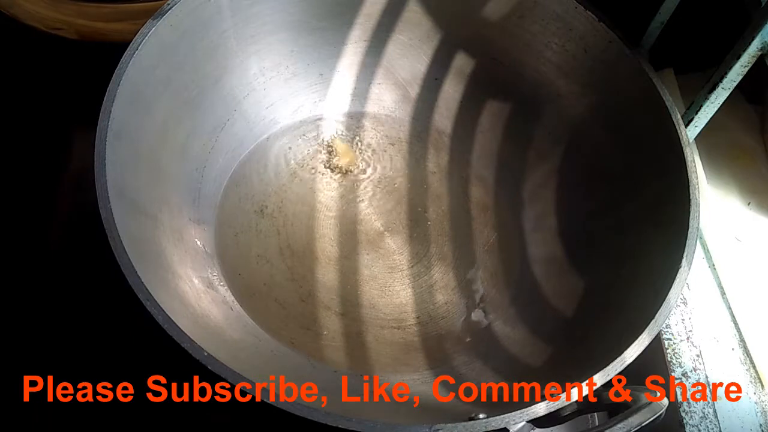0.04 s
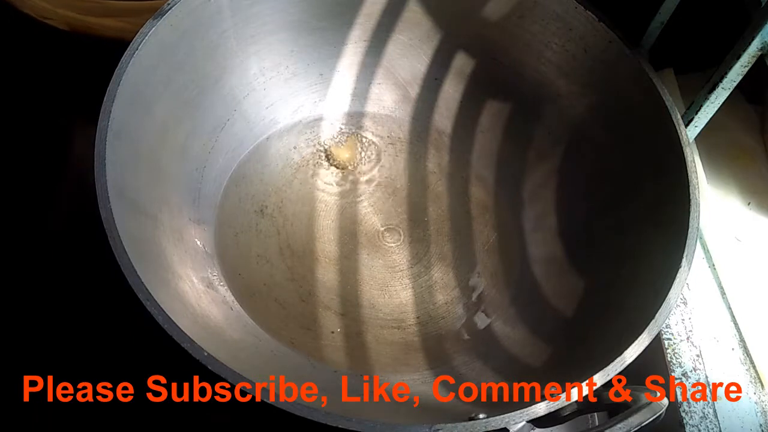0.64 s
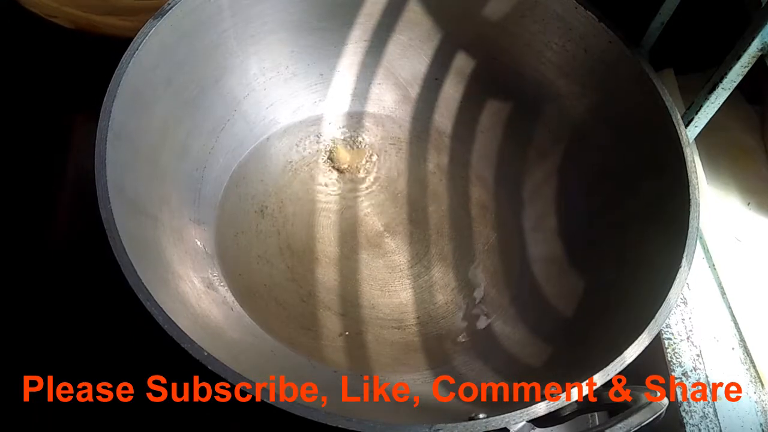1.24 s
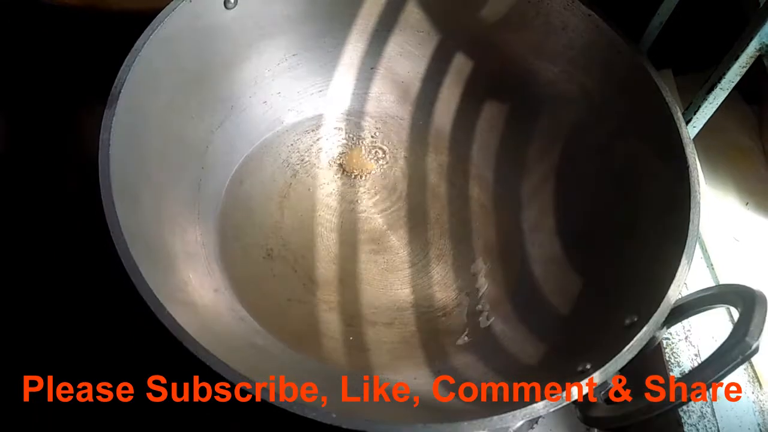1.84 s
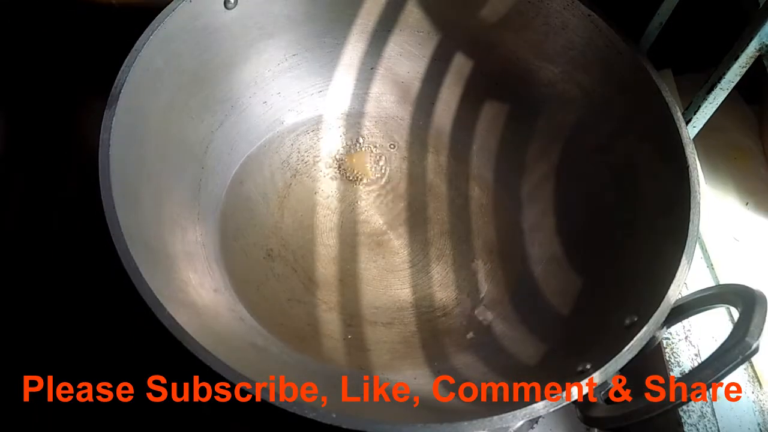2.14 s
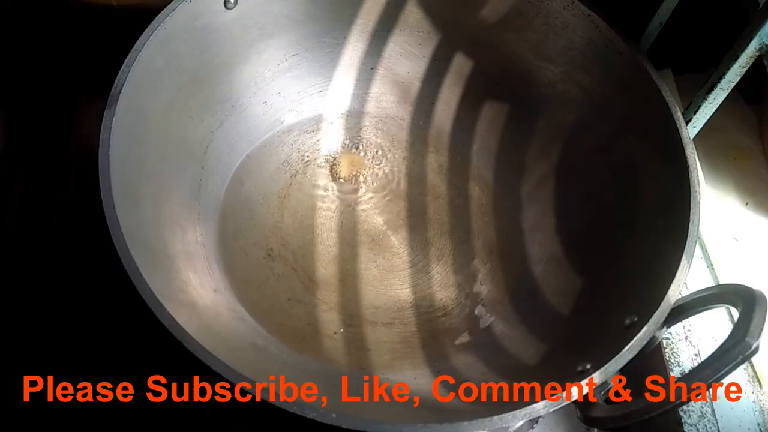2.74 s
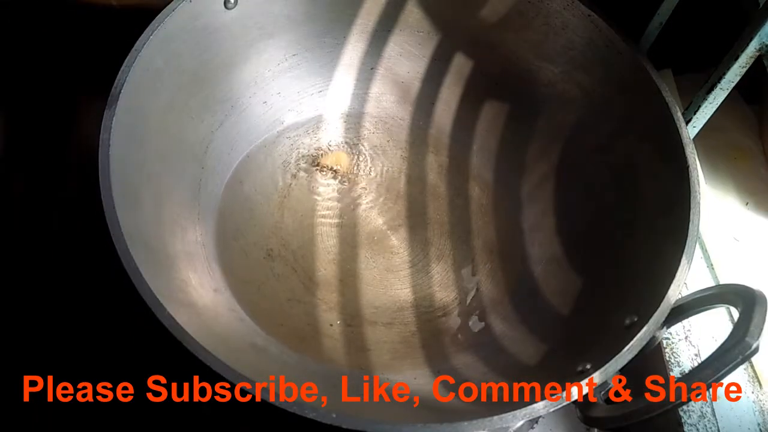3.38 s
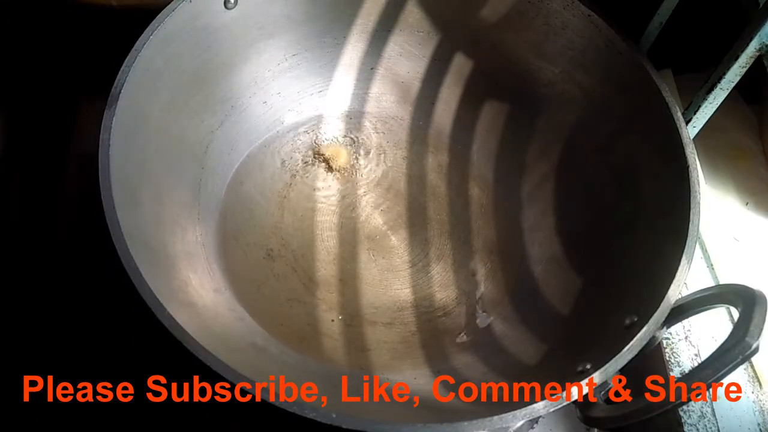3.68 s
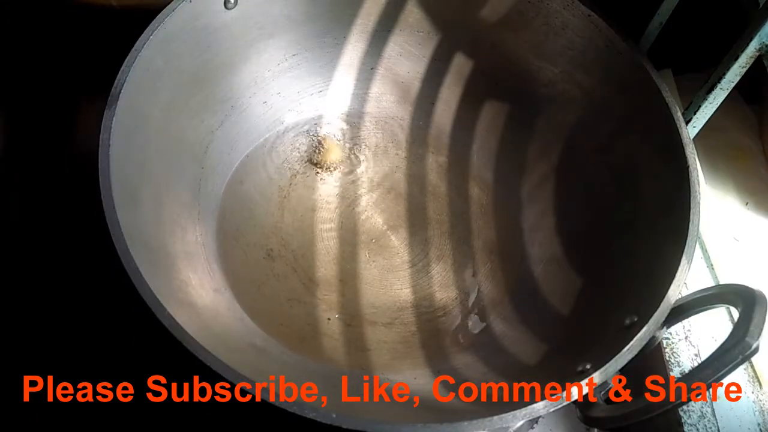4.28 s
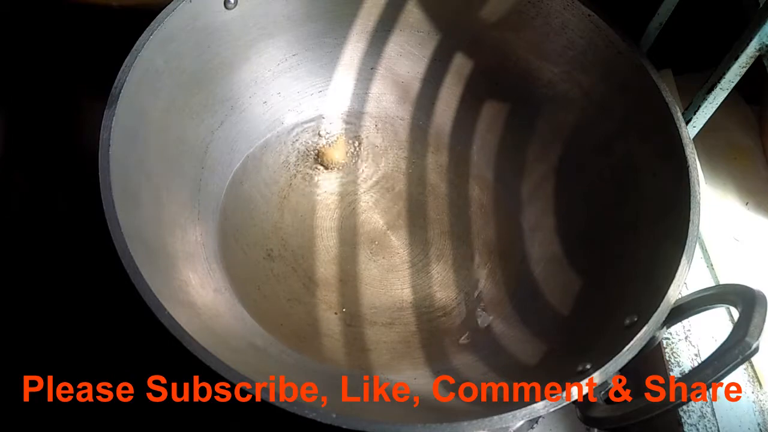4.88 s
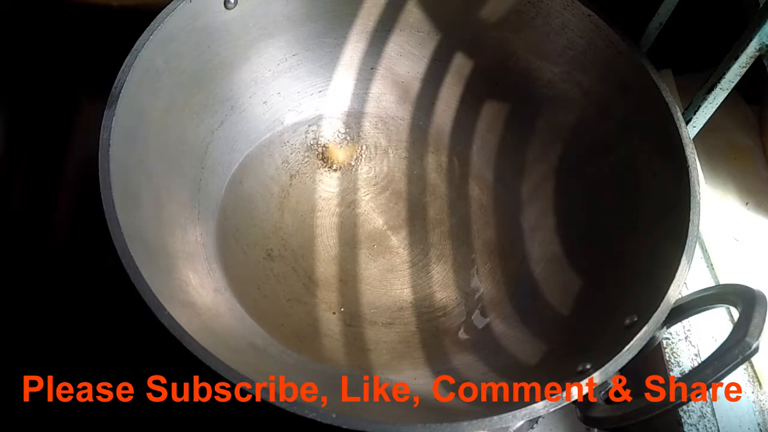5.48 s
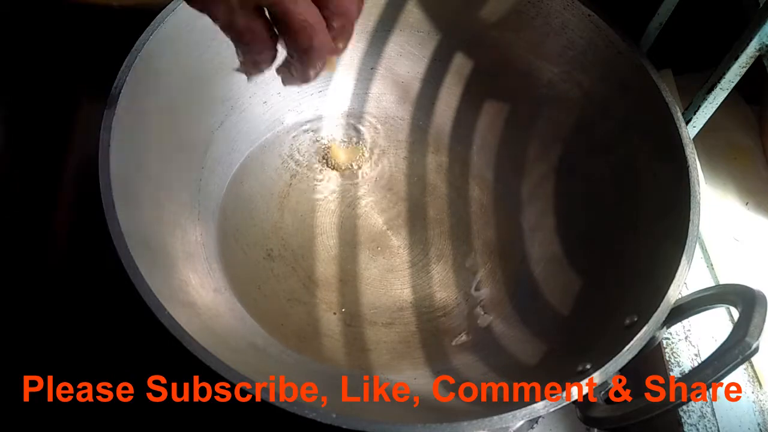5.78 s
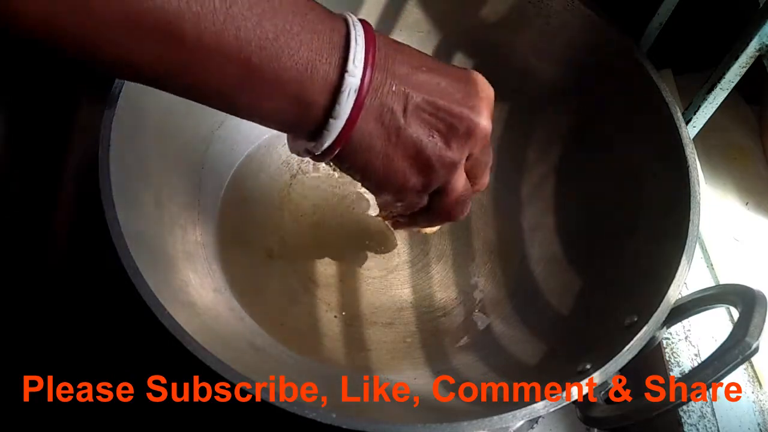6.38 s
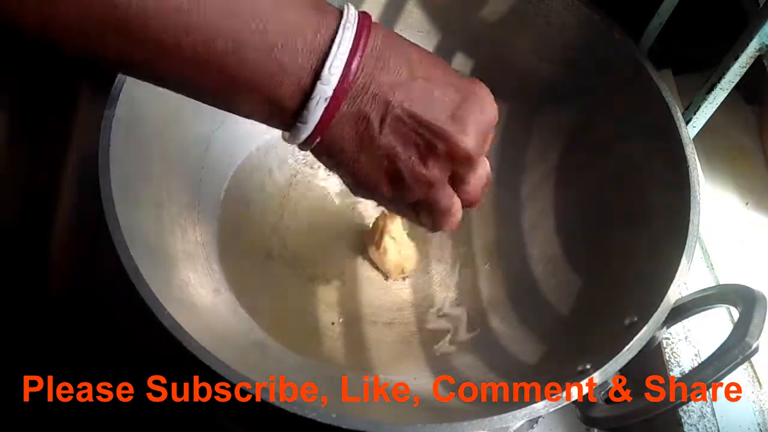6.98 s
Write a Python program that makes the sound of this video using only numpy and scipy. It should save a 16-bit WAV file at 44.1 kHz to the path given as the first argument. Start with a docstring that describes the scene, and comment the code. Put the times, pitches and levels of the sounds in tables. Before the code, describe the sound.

A drop of batter spits in hot oil in a deep metal pan, giving sharp, irregular pops with faint steam whistles. About a second in, a knock leads into a loud, ringing clatter of a steel dish. Soft knocks, low thuds and one short muffled hoot come between further pops. At the very end, a lump of batter starts to sizzle. The microphone is close, in a small, quiet kitchen.

```python
"""A drop of batter spits in hot oil in a deep metal pan, close by, in a small, quiet kitchen.
Each steam bubble snaps its skin of oil and rings the hollow inside; steam whistles faintly in the pan.
Nearby some steelware, likely a dish, is bumped and clatters. There are dull knocks and low thuds,
and something hoots once, muffled. At the end a lump of batter meets the oil and starts to sizzle."""
import sys
import numpy as np
from scipy import signal
from scipy.fft import rfft, irfft, next_fast_len
from scipy.io import wavfile
from scipy.ndimage import uniform_filter1d

SR = 44100
rng = np.random.default_rng(int(sys.argv[2]) if len(sys.argv) > 2 else 0)


def master_out(mix):
    """Clip the mix to full scale and print it as 16-bit PCM to the path in sys.argv[1]."""
    frames = np.transpose(np.atleast_2d(mix))
    ceiling = np.clip(frames, -1, 1)
    pcm = np.round(ceiling * 32767).astype(np.int16)
    wavfile.write(sys.argv[1], SR, pcm)


N = 318754
SIZE = 32768  # samples set aside for one short sound
T, HZ = np.arange(SIZE) / SR, np.fft.rfftfreq(SIZE, 1 / SR)  # its times and frequencies
TIME = np.arange(N) / SR
ROOM_T60 = .26  # a "t60" is the seconds a sound takes to fade by 60 dB

# tone of a bubble's oily skin snapping: (frequency [Hz], gain [dB])
SNAP_TONE = [(300, -39.5), (1500, -27), (3200, -25), (5500, -15.5), (7500, -8), (9200, -3), (10500, -1),
             (11500, -4), (12700, -3.5), (13500, -8), (14400, -7)]


def amp(db):
    """Turns decibels into a factor to multiply by."""
    return 10 ** (np.asarray(db) / 20)


def unit_level(x):
    """Scales a sound to an average (rms) level of 1."""
    return x / np.sqrt(np.mean(x ** 2) + 1e-30)


def at_level(x, db):
    """Scales a hit so that its energy, spread over 40 ms, has this level."""
    return amp(db) * x / np.sqrt(np.sum(x ** 2) / (.04 * SR) + 1e-30)


def curve(points, hz):
    """Joins the points of a tone table and gives its values at hz."""
    f, value = np.transpose(points)
    return np.interp(np.log(hz + 1), np.log(f + 1), value)


def add(mix, s, sound):
    """Mixes a sound in at s seconds."""
    part = mix[max(round(s * SR), 0):][:len(sound)]
    part += sound[:len(part)]


def fade(t60):
    """Dies away by 60 dB every t60 seconds."""
    return np.exp(-np.log(1000) * T / t60)


def colour(x, db):
    """Filters a sound with one gain in dB for each frequency in HZ."""
    log_gain = np.log(amp(np.maximum(db, db.max() - 90)))
    mirrored = np.r_[log_gain, log_gain[-2:0:-1]]
    response = np.exp(np.conj(signal.hilbert(mirrored)))  # rings after a hit, never before
    return signal.fftconvolve(x, irfft(response[:len(HZ)])[:SIZE // 4])[:len(x)]


def resonance(hz, width_hz):
    """Gain in dB of something that rings around one pitch."""
    return -10 * np.log10(1 + ((HZ ** 2 - hz ** 2) / ((HZ + 1) * width_hz)) ** 2)


def echoes(direct_db, t60, near_t60=.035, rise_s=.00083, crack_db=4, crack_t60=.0066):
    """Fading noise: the direct crack, quick echoes from close by, then the kitchen."""
    near = np.hypot(amp(crack_db) * fade(crack_t60), fade(near_t60))
    decay = np.hypot(amp(direct_db) * near, fade(t60))
    return rng.standard_normal(SIZE) * decay * (1 - np.exp(-T / rise_s))


def puff(length_s, tone_db):
    """Filtered noise that swells and sinks once."""
    swell = np.hanning(int(np.clip(length_s * SR, 2, SIZE)))
    noise = colour(rng.standard_normal(SIZE), tone_db)[-len(swell):]
    return unit_level(noise * swell)


def pan_tone():
    """Gain in dB for sound that bounces around inside the pan."""
    # ringing of the air between oil and pan wall: (pitch [Hz], width [Hz], gain [dB])
    air_rings = [(1562, 35, 18.5), (1956, 120, 16.5), (2516, 150, 10), (2946, 48, 11.5), (3518, 42, 14.5),
                 (3930, 98, 6.5), (4517, 57, 8.5), (4710, 53.3, 7.5), (5170, 69, 6), (5570, 40, 9),
                 (6144, 90, 4.5), (6770, 240, 4), (8400, 150, -0.5), (9075, 160, 4), (10330, 550, 3),
                 (12910, 580, 5)]
    return 10 * np.log10(1 + sum(amp(db + resonance(hz, width)) ** 2 for hz, width, db in air_rings))


def kitchen_air(level_db=-72.5, waver_db=.63, calm_hz=3500):
    """Quiet air: the lows and middle waver in patches, the hiss above stays even."""
    # tone of the still kitchen: (frequency [Hz], gain [dB])
    air_tone = [(20, -22), (45, -12.5), (83, 0.5), (115, -9), (170, -12.5), (250, -10.5), (370, -22),
                (460, -9), (560, -6), (830, -4.5), (1400, -11), (2100, -15.5), (3200, -23.5), (6000, -26.5),
                (14300, -30)]
    hz, _, spectrum = signal.stft(rng.standard_normal(N), SR, nperseg=1024)
    patches = uniform_filter1d(rng.standard_normal(spectrum.shape), size=5, axis=0)
    patches = unit_level(uniform_filter1d(patches, size=9, axis=1))
    waver = waver_db * patches / (1 + (hz[:, None] / calm_hz) ** 4)
    spectrum *= amp(curve(air_tone, hz)[:, None] + waver)
    return amp(level_db) * unit_level(signal.istft(spectrum, SR, nperseg=1024)[1][:N])


def murmur(swell_db=5, swell_s=.09):
    """Air hums faintly at steady pitches, each swelling and sinking by itself."""
    # the kitchen's low hums, then the pan's over the simmering oil: (pitch [Hz], width [Hz], level [dB])
    hums = [(165.5, 8.3, -86.5), (310, 38, -84), (449, 30, -85), (850, 120, -79.5), (1094, 190, -82.5),
            (1464, 170, -79.5), (1967, 160, -81), (2420, 600, -89), (3040, 250, -95.5)]
    out = np.zeros(N)
    steps = np.arange(0, 8, swell_s)
    for hz, width_hz, db in hums:
        wander = np.clip(rng.standard_normal(300), -2, 2)[:len(steps)]
        swell = amp(swell_db * np.interp(TIME, steps, wander))
        hum = colour(rng.standard_normal(N), 2 * resonance(hz, width_hz))
        out += amp(db) * unit_level(swell * hum)
    return out


def thuds(steepness=1.7, width_share=.41):
    """Faint bumps, each ringing around one deep pitch."""
    # low bumps: (time [s], level [dB], pitch [Hz], t60 [s])
    bumps = [(1.41, -71, 55.2, .19), (1.903, -61.5, 64, .03), (2.042, -66, 82, 0.65),
             (3.639, -70.5, 85, .16), (6.09, -64, 80, .1), (6.599, -71.5, 170, 0.65)]
    out = np.zeros(N)
    for s, db, hz, t60 in bumps:
        thud = colour(echoes(0, t60, rise_s=.004), steepness * resonance(hz, hz * width_share))
        add(out, s, at_level(thud, db))
    return out


def knocks(steepness=1.9, hard_db=-37, tick_db=-14, boom_db=-7, boom_hz=265, room_hz=455):
    """Soft blows on heavy things: a tick, a dull body and a boom that stir a low note of the room."""
    # knocks around the stove: (time [s], body level [dB], body pitch [Hz])
    blows = [(.48, -66, 646.4), (0.7526, -60, 600), (0.7594, -41, 864), (1.953, -63.5, 800),
             (2.259, -66, 606), (2.979, -54, 690)]
    out = np.zeros(N)
    room = 20 * np.log10(np.hypot(1, amp(8 + resonance(room_hz, width_hz=25))))
    for s, db, hz in blows:
        # a softer blow stays in contact longer, so it rises and fades more slowly
        rise_s = .0003 * 2 ** ((hard_db - db) / 5)
        t60 = .23 * 2 ** ((hard_db - db) / 28.5)
        tick = colour(echoes(0, t60=.025, rise_s=rise_s), steepness * resonance(1100, width_hz=1400))
        body = colour(echoes(0, t60, rise_s=rise_s), steepness * resonance(hz, hz * .8) + room)
        boom = colour(echoes(0, t60, rise_s=rise_s), steepness * resonance(boom_hz, boom_hz) + room)
        add(out, s, at_level(tick, db + tick_db) + at_level(body, db) + at_level(boom, db + boom_db))
    return out


def steam_whistles(width_hz=85, count=12, faint_per_s=1, faint_s=.14, faint_hz=2686, faint_db=-84.5):
    """Thin jets of steam make the air in the pan sing in short, fuzzy whistles."""
    # the clearer whistles: (middle time [s], length [s], pitch [Hz], level [dB])
    clear = [(.04, 0.086, 1500, -68), (0.356, .13, 1494, -61.5), (.33, .26, 1963, -67.5),
             (.472, 0.24, 1492, -68), (1.846, .15, 1544, -66), (2.522, .14, 1495, -75.5),
             (3.529, 0.15, 1503, -68), (4.13, 0.081, 1960, -72.5), (4.21, .1, 1430, -71.5),
             (4.793, 0.17, 1938, -74), (4.962, .12, 1068, -68.5), (5.753, .5, 1948, -74),
             (5.904, .077, 1113, -68.5), (5.962, .19, 1487, -73), (6.251, .74, 1946, -79.5),
             (6.542, 0.097, 1060, -71), (6.583, .17, 1520, -73.5), (6.769, .12, 1498, -67.5),
             (6.907, .21, 2480, -81)]
    # fainter, higher ones come at random
    when, height = rng.random((count, 2)).T
    pitches = faint_hz * 2 ** (.17 * (2 * height - 1))
    times = when * count / faint_per_s
    faint = [(s, faint_s, hz, faint_db) for s, hz in zip(times, pitches) if s < N / SR]
    out = np.zeros(N)
    for s, length, hz, db in clear + faint:
        add(out, s - length / 2, amp(db) * puff(length, 2 * resonance(hz, width_hz)))
    return out


def hoot(peak_s=2.635, pitch_hz=224, fall_hz_per_s=560, ring_hz=450, width_hz=95, low_hz=186):
    """A short falling hoot through a wall; two low notes of the kitchen ring on after it."""
    t = np.arange(-.1, .1, 1 / SR)  # seconds from the peak
    hz = pitch_hz - fall_hz_per_s * t
    slope_s = np.where(t < 0, .019, .022)  # rises a little faster than it dies
    swell = amp(-42.5) / np.cosh(2 * t / slope_s)
    phase = 2 * np.pi * np.cumsum(hz) / SR
    # each overtone is louder the nearer it is to ring_hz
    second, third = (np.sin(k * phase) / np.hypot(1, 2 * (k * hz - ring_hz) / width_hz) for k in (2, 3))
    out = np.zeros(N)
    add(out, peak_s + t[0], swell * (second + amp(-4) * (np.sin(phase) + third)))
    for room_hz, db in (ring_hz, -56), (low_hz, -57.5):
        ring = np.sin(2 * np.pi * room_hz * T) * fade(t60=.19) * (1 - np.exp(-T / .0038))
        add(out, peak_s + .023, at_level(ring, db))
    return out


def dish_clatter(ring_t60=.17, rise_s=.0038, echo_db=-8, uneven_db=1.5):
    """The steel dish rocks and bounces; every hit crashes and sets the same notes ringing."""
    # hits of the dish: (time [s], crash level [dB], ring level [dB], treble limit [Hz])
    hits = [(0.813, -34, -43.5, 15000), (.819, -27, -31.5, 14500), (.843, -25.5, -23, 9100),
            (.857, -30, -27.5, 11980), (.869, -25, -19, 15000), (.884, -28.5, -22, 14990),
            (.934, -27, -36, 14000), (.965, -27.5, -27.5, 13100), (0.986, -37, -50, 13900),
            (1.006, -42, -59, 10500), (1.066, -44.5, -47, 15100)]
    # notes the steel rings at: (pitch [Hz], gain [dB])
    notes = [(950, -19.5), (1838, -10), (2449, -12.5), (2560, -22), (3133, -17.5), (3300, -19.5),
             (3688, -16.5), (3930, -8), (4056, -4.5), (5087, -18.5), (5728, -14), (6024, -15), (6316, -8),
             (6531, -7.5), (6724, 0), (7235, -16), (7780, -14), (7885, -14.5), (8122, -8), (8463, -3),
             (8711, -5), (9108, -12.5), (9614, -5.5), (10167, -6.5), (10698, 3), (11030, -6.5), (11653, 2),
             (12581, 3), (13180, -11), (14213, 3.5)]
    # tone of the crash: (frequency [Hz], gain [dB])
    crash_tone = [(100, -34.5), (350, -20.5), (600, -12.5), (950, -7.5), (1400, -3.5), (2500, -7),
                  (4000, -3), (5200, -4.5), (8800, 1.5), (12500, 3.5), (14400, 4.5)]
    out = np.zeros(N)
    hz, db = np.transpose(notes)
    # the crash is strongest around the notes
    body = 10 * np.log10(1 + sum(amp(6 + resonance(f, width_hz=90)) ** 2 for f in hz))
    for s, crash_db, ring_db, top_hz in hits:
        phase, luck = rng.random(len(hz)), rng.standard_normal(len(hz))
        strength = amp(db + uneven_db * luck) / np.sqrt(1 + (hz / top_hz) ** 20)
        waves = np.sin(2 * np.pi * (hz[:, None] * T + phase[:, None]))
        ring = strength @ waves * fade(ring_t60) * (1 - np.exp(-T / rise_s))
        room = signal.fftconvolve(ring, echoes(0, ROOM_T60))[:SIZE]
        treble_cut = 10 * np.log10(1 + (HZ / top_hz) ** 20)
        crash = colour(echoes(direct_db=3, t60=.31), curve(crash_tone, HZ) + body - treble_cut)
        add(out, s, at_level(ring, ring_db) + at_level(room, ring_db + echo_db))
        add(out, s, at_level(crash, crash_db))
    return out


def sizzle(start_s=7.022, rise_s=.059, level_db=-54, bubbles_per_s=5000):
    """Wet batter sinks into the oil, and thousands of tiny bubbles burst each second."""
    # tone of the sizzle: (frequency [Hz], gain [dB])
    sizzle_tone = [(300, -32), (700, -15), (1100, -8.5), (2000, 0), (2700, -2), (4200, -10), (5200, -6.5),
                   (7000, -4.5), (10000, -11), (12000, -19.5), (14300, -21)]
    strength = rng.standard_normal(N) * amp(-np.minimum(rng.exponential(1, N), 5))
    clicks = strength * (rng.random(N) < bubbles_per_s / SR)
    bursts = signal.fftconvolve(clicks, echoes(7.4, ROOM_T60))[:N]
    hiss = colour(bursts, curve(sizzle_tone, HZ) + .092 * pan_tone())
    swell = np.tanh(np.maximum(TIME - start_s, 0) / rise_s)
    return amp(level_db) * swell * unit_level(hiss)


def fizzes(level_db=-78.5):
    """Clouds of very small bubbles fizz softly between the spits."""
    # bubble clouds: (middle time [s], length [s])
    clouds = [(0.236, 0.44), (1.28, 0.18), (1.481, 0.24), (2.715, .09), (3.22, 0.18)]
    out = np.zeros(N)
    for s, length in clouds:
        add(out, s - length / 2, amp(level_db) * puff(length, curve(SNAP_TONE, HZ) + pan_tone()))
    return out


def faint_bubbles(count=12, per_s=.95, level_db=-84, snap_hz=9100, ring_hz=7000):
    """Small bubbles that burst at random moments, as extra rows for spits()."""
    when, loudness, height = rng.random((count, 3)).T
    times = when * count / per_s
    levels = level_db + 3 * (2 * loudness - 1)
    pitches = ring_hz * 2 ** (.3 * (2 * height - 1))
    return [(s, db, snap_hz, db, hz, 0) for s, db, hz in zip(times, levels, pitches) if s < N / SR]


def spits(steepness=1.3, typical_hz=4400, typical_width_hz=310, typical_db=-61.5):
    """Steam bubbles burst in the pan: each snaps its oily skin and rings the small hollow inside."""
    # bursting bubbles: (time [s], snap level [dB], snap pitch [Hz], ring level [dB], ring pitch [Hz],
    # direct sound over the room [dB])
    bubbles = [(0.0203, -52.5, 11500, -85, 3420, 4), (.098, -65, 9400, -38.5, 3260, 3),
               (0.0988, -54.5, 6950, -43.5, 6600, 11.5), (.112, -75, 6600, -39.5, 3550, 18),
               (0.343, -70, 8800, -74.5, 4100, -9), (.433, -52, 11850, -63, 4310, 2),
               (0.675, -71.5, 9536, -79, 7130, -2), (1.182, -56, 12900, -72, 6770, 10),
               (1.3467, -65, 9830, -69, 6510, 3), (1.582, -68, 10400, -76, 6600, -8),
               (1.794, -85, 12000, -45.5, 5580, -4), (2.259, -82, 8630, -65.5, 7850, -3),
               (2.3742, -52, 11900, -63, 4350, 3), (2.437, -64, 12000, -71, 4320, 16),
               (2.961, -46, 12950, -64, 4460, -15), (3.535, -50.5, 8870, -46, 5580, -12),
               (3.577, -60.5, 9100, -53, 6020, 7), (4.1524, -51, 12000, -62, 4270, -3),
               (4.172, -50, 12940, -61.5, 3590, -8), (4.211, -53, 13000, -64, 4550, 0),
               (4.228, -48, 9500, -68, 3660, 5), (4.289, -52.5, 10460, -68, 4800, -5),
               (4.3002, -48, 10800, -59.5, 4760, 9), (4.451, -54, 9480, -70.5, 4610, 5.5),
               (4.661, -66, 9000, -67.5, 7900, -10), (4.6694, -64, 9100, -49, 8800, 8.5),
               (5.487, -57, 10550, -69, 4640, -11), (5.541, -42, 12900, -54, 4630, 6),
               (5.598, -51.5, 12800, -52, 8500, -1.5)]
    out, pan = np.zeros(N), pan_tone()
    for s, snap_db, snap_hz, ring_db, ring_hz, direct_db in bubbles + faint_bubbles():
        # a wider resonance dies sooner: small, high hollows do, and so do those torn open violently
        violence = max(ring_db - typical_db, 0) / 25
        width_hz = typical_width_hz * (ring_hz / typical_hz) ** 2.1 * 2 ** violence
        skin = 20 * np.log10(np.hypot(1, amp(6 + resonance(snap_hz, width_hz=700))))
        snap = colour(echoes(direct_db, ROOM_T60), curve(SNAP_TONE, HZ) + skin + pan)
        ring = colour(echoes(direct_db, ROOM_T60), steepness * resonance(ring_hz, width_hz) + pan)
        add(out, s - .001, at_level(snap, snap_db) + at_level(ring, ring_db))
    return out


def scene():
    """All sounds reach two close microphone openings, with slightly different timing in the treble."""
    # how unlike left and right are: (frequency [Hz], side over mid [dB])
    stereo_spread = [(60, -49), (2900, -68), (4400, -42), (8100, -11.5), (15000, -8)]
    mid = spits() + fizzes() + dish_clatter() + knocks() + thuds()
    mid = mid + steam_whistles() + murmur() + hoot() + sizzle() + kitchen_air()
    size = next_fast_len(N + SIZE)
    hz = np.fft.rfftfreq(size, 1 / SR)
    ripple = 1j * np.sqrt(2) * np.sin(2 * np.pi * hz / 1900)  # which side leads changes with frequency
    side = irfft(rfft(mid, size) * amp(curve(stereo_spread, hz)) * ripple, size)[:N]
    return np.array([mid + side, mid - side])


def record(dry):
    """Cuts off the treble above 14400 Hz."""
    low_pass = signal.firwin(511, 14400, window=("kaiser", 8), fs=SR)
    return signal.oaconvolve(dry, low_pass[None], "same", axes=1)


dry = scene()
out = record(dry)
master_out(out)
```